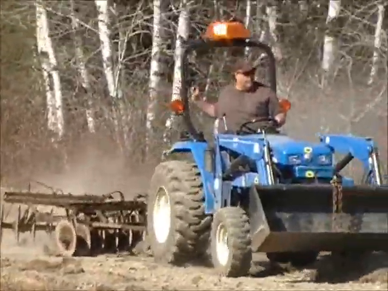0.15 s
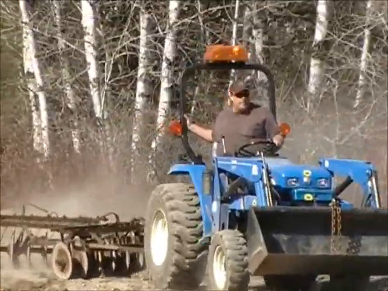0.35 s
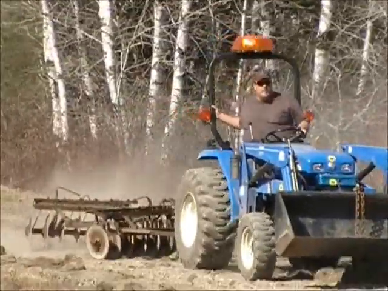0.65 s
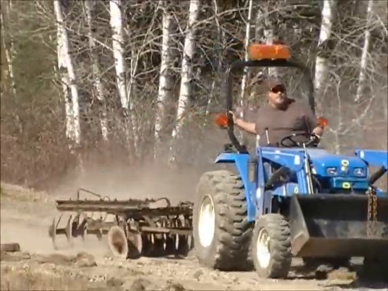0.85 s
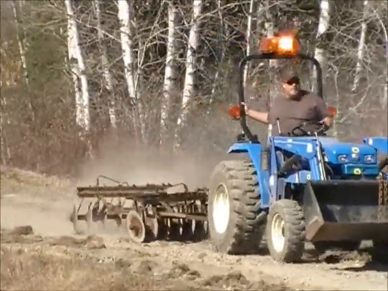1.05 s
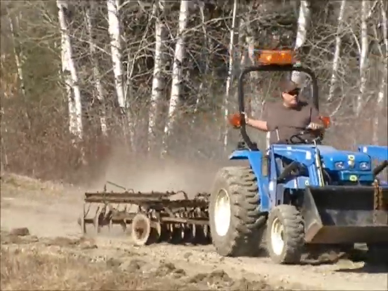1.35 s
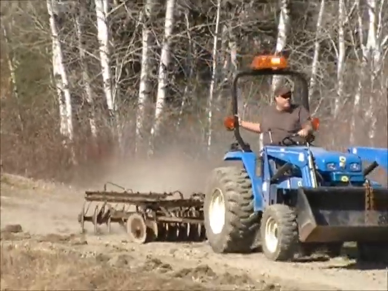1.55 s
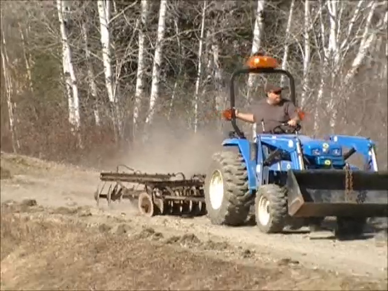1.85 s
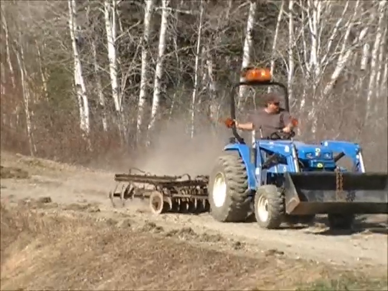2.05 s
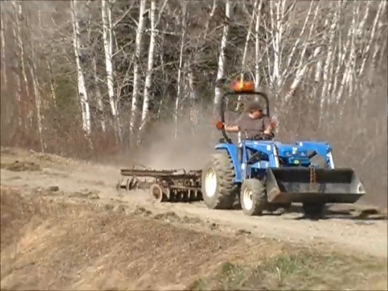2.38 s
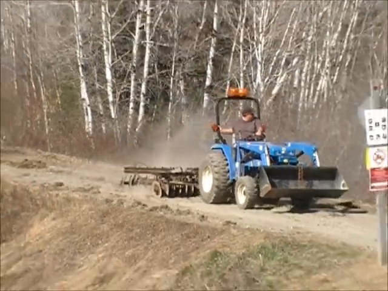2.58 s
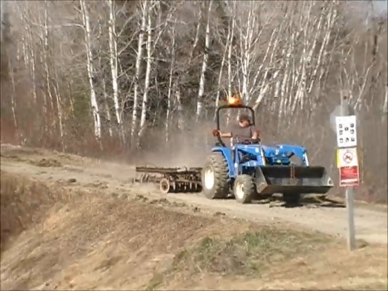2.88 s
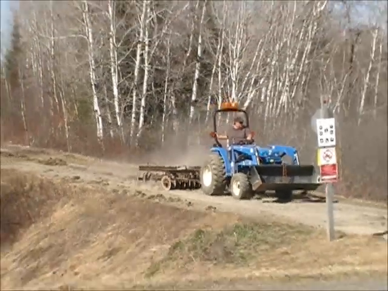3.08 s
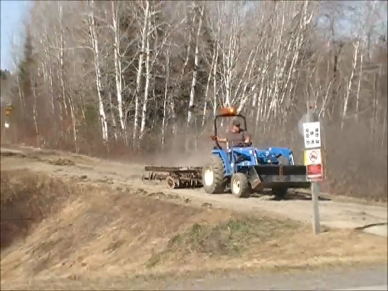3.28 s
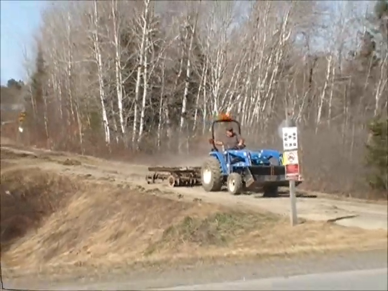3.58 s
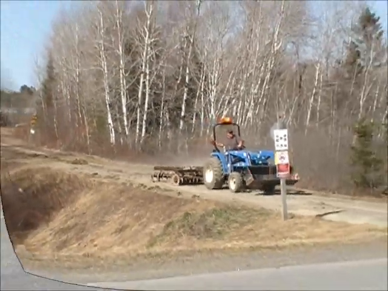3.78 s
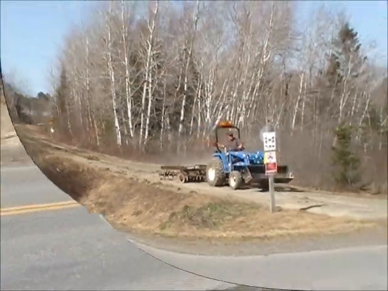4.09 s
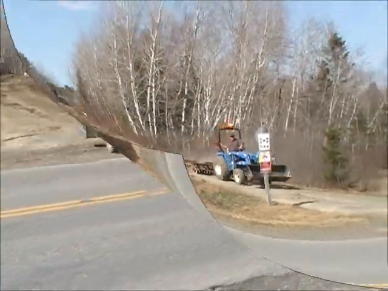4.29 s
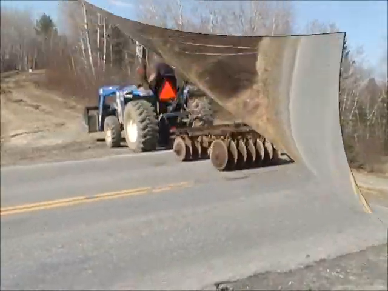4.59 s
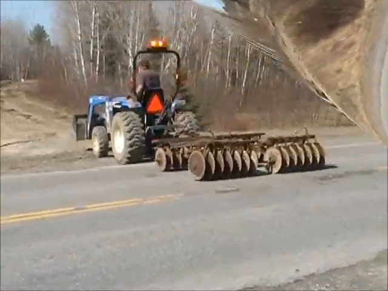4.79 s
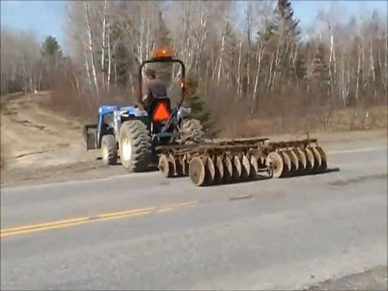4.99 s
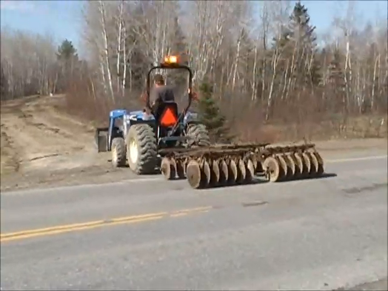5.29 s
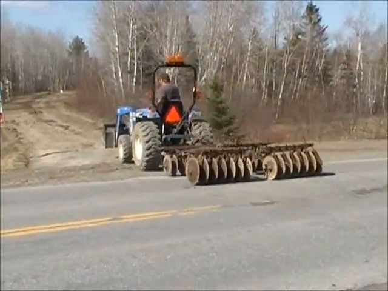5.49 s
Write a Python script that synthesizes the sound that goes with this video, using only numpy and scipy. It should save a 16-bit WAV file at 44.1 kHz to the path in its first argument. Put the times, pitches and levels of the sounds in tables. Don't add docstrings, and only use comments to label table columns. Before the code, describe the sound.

Outdoors on an exposed microphone, a strong gust booms and crackles for about a second. As it eases, a far small diesel tractor emerges with gritty rattling and clanking from its towed disc harrow. At about three and a half seconds the sound cuts to the machine close by on asphalt, with a higher engine hum, hard metallic knocks, ringing discs and more low wind puffs.

```python
import sys
import numpy as np
from scipy import signal
from scipy.fft import rfft, irfft
from scipy.io import wavfile
from scipy.ndimage import uniform_filter1d

SR = 44100
rng = np.random.default_rng(int(sys.argv[2]) if len(sys.argv) > 2 else 0)


def invert_db(level):
    return 10 ** (np.asarray(level, dtype=float) / 20)


def store_wav(level_fs):
    pcm = np.round(np.clip(np.atleast_2d(level_fs), -1, 1) * 32767)
    wavfile.write(sys.argv[1], SR, pcm.T.astype(np.int16))


N = 248724

CUT_S = 3.529
T = np.arange(N) / SR
NEAR = T >= CUT_S

# time in seconds, buffeting in dB, brightness in dB.
BREEZE = [(0.0, -9, -7), (0.42, -17, -11), (0.53, -15.5, -11.5), (0.78, -16, -13), (0.88, -25, -13.5),
          (1.17, -38.5, -29), (1.5, -21.5, -20.5), (1.9, -18.5, -16), (2.3, -23, -22.5), (2.6, -28, -26),
          (2.85, -33, -17.5), (3.1, -46, -26), (3.5, -15, -17), (3.9, -32, -21.5), (4.3, -13, -9),
          (4.7, -31, -21.5), (5.1, -18.5, -15.5), (5.64, -12, -21.5)]
# start in seconds, peak in dB, hold in seconds.
PUFFS = [(0.029, -8.5, 0.016), (0.095, -16, 0.014), (0.136, -10, 0.0098), (0.148, -8.5, 0.0095),
         (0.186, -7.5, .005), (0.2, -12.5, 0.011), (0.253, -9.5, 0.019), (0.351, -11.5, 0.017),
         (0.399, -10, 0.024), (0.466, -9, 0.029), (0.576, -10.5, 0.022), (0.655, -10, 0.031),
         (0.7, -8, 0.009), (0.736, -10.5, 0.0042), (0.771, -10, .014), (0.8, -9.5, .005), (0.83, -15, .005),
         (0.92, -21, .01), (0.974, -19, .01), (1.028, -25.5, .01), (1.253, -24.5, .01), (1.405, -13, 0.021),
         (1.654, -8.5, 0.0081), (1.83, -11.5, 0.018), (1.987, -12.5, 0.056), (2.143, -9.5, 0.0091),
         (2.238, -14, 0.0098), (2.326, -14, 0.024), (2.624, -19.5, 0.011), (2.773, -16.5, 0.035),
         (2.882, -19.5, 0.04), (3.032, -19, 0.0091), (3.137, -14.5, 0.023), (3.281, -9, 0.021),
         (3.481, -11, 0.033), (3.615, -12, .03), (3.762, -7.5, 0.013), (3.961, -7, 0.034),
         (4.058, -16, 0.078), (4.297, -9.5, 0.13), (4.458, -11.5, 0.11), (4.692, -16, 0.0082),
         (4.817, -21, .01), (4.914, -10.5, 0.078), (5.017, -8, 0.098), (5.3, -11.5, 0.15),
         (5.54, -14.5, 0.027)]
SWELL_DB_PER_S, SLACK_DB_PER_S = 263, 227
# frequency in Hz, density in dB per Hz.
BUFFET_COLOUR = [(12, -66), (30, -10), (60, -3.5), (113, 1.5), (203, -2.5), (243, -6), (305, -8),
                 (347, -13), (420, -17), (550, -38), (920, -120)]
# frequency in Hz, density in dB per Hz.
FAST_BUFFET_COLOUR = [(30, -36), (60, -9.5), (120, 1), (170, -1.5), (240, -3), (330, -5), (465, -15.5),
                      (700, -38)]
FAST_ENDS_S = 0.93
# frequency in Hz, density in dB per Hz.
CRACKLE_COLOUR = [(200, -10), (330, -0.5), (600, -5.5), (1200, -19.5), (2500, -35.5), (5000, -56.5),
                  (12000, -72)]
# start in seconds, peak in dB, ring in Hz, t60 in seconds.
THUMPS = [(0.246, -25, 95, 0.097), (0.564, -20, 249, 0.083), (0.645, -20, 143, 0.064),
          (0.909, -14.5, 135, 0.025), (1.386, -22, 170, 0.059), (1.535, -23, 120.5, 0.085),
          (1.646, -37, 153, 0.061), (1.815, -22, 195, 0.089), (1.966, -18, 83.4, 0.059),
          (2.023, -15, 101, 0.071), (2.045, -17.5, 330, 0.048), (2.33, -19.5, 310, 0.053),
          (3.29, -18, 300, 0.034), (2.135, -19, 143, 0.07), (2.238, -14.5, 78.1, 0.063),
          (2.313, -18, 128, 0.095), (2.409, -22, 88.8, 0.078), (2.601, -18, 225, 0.06),
          (2.872, -23, 153, 0.059), (3.138, -11, 268, 0.065), (3.158, -20.5, 180, 0.06),
          (3.255, -19, 130, 0.08)]
# start in seconds, peak in dB.
SLAPS = [(0.026, -29), (0.098, -24), (0.134, -26), (0.151, -23), (0.188, -18), (0.249, -25), (0.302, -25),
         (0.334, -26), (0.354, -29), (0.401, -21), (0.429, -25), (0.468, -25), (0.505, -23), (0.545, -30),
         (0.583, -31), (0.598, -26), (0.618, -29), (0.642, -27), (0.708, -25), (0.748, -22), (0.783, -25),
         (0.837, -34), (0.882, -39), (0.921, -32)]
# start in seconds, peak in dB.
TICKS = [(0.023, -37), (0.1251, -45), (0.1466, -50), (0.1994, -47), (0.2583, -45), (0.397, -54),
         (0.7228, -55), (0.7437, -53), (0.7701, -52), (0.7824, -57)]

# time in seconds, level in dB.
HEARD_FAR_NEAR = [
    [(0.6, -68), (0.88, -54.5), (1.22, -43.5), (1.36, -35.5), (1.7, -35.5), (2.05, -37), (2.3, -33),
     (2.8, -33), (3.0, -32.5), (3.3, -35), (3.44, -33.5), (3.52, -42.5)],
    [(3.53, -18), (4.1, -18), (4.85, -17.5), (5.17, -23.5), (5.3, -21.5), (5.64, -21.5)],
]
# frame, grit and housing, each in dB.
FAINT_DB = [-51.5, -64, -72]
GRIT_FAR_DB, GRIT_GAIN_DB_PER_S, GRIT_NEAR_DB = -9.5, 3, -7
HOUSING_FAR_DB, HOUSING_NEAR_DB = -39.5, -6.5
# start in seconds, rise in dB, hold in seconds.
RUTS = [(0.665, 15.5, 0.038), (1.231, 8.5, 0.02), (1.556, 5, 0.036), (1.763, -0.5, 0.037),
        (2.097, 6.5, 0.05), (2.215, -2, 0.015), (2.672, 4.5, 0.069), (2.82, 5.5, 0.14), (3.02, 2, 0.022),
        (3.145, 7, 0.048), (3.234, 5.5, 0.039), (3.38, 3, 0.099), (3.525, 8, 0.023), (3.745, 2.5, 0.09),
        (3.916, 1, 0.066), (4.008, 3, 0.036), (4.165, 5.5, 0.033), (4.365, 2.5, 0.0097), (4.522, 1, 0.049),
        (4.605, 4.5, 0.031), (4.711, 4, 0.0085), (4.823, 4, 0.06), (4.91, 4.5, 0.037), (4.974, 1.5, 0.025),
        (5.04, 4.5, 0.037), (5.109, 3.5, 0.022), (5.19, 5.5, 0.027), (5.238, 3.5, 0.051), (5.292, 2, 0.044),
        (5.375, 2, 0.021), (5.52, 1.5, 0.15)]
BITE_S, EASE_S = 0.0082, 0.04
FRAME_BITE, HOUSING_BITE = 0.57, 0.79

# time in seconds, firing rate in Hz, exhaust level in dB.
EXHAUST = [(0, 56.44, -42), (1.0, 55.8, -57), (1.5, 56.28, -42), (2.2, 56.17, -45.5), (2.6, 56.16, -43),
           (3.0, 56.22, -45), (3.52, 56.26, -45.5), (3.53, 62.73, -36.5), (4.1, 62.7, -33),
           (4.5, 63.1, -37.5), (4.8, 63.07, -34), (5.1, 62.3, -42), (5.64, 62.1, -36)]
# multiple of the firing rate, far level in dB, near level in dB.
EXHAUST_ORDERS = [(1, 4.5, 1.5), (2, -2, -5), (3, 1, -0.5), (4, -6.5, 0.5), (5, -11, -1.5), (6, -4.5, -14)]
# frequency in Hz, density in dB per Hz.
HOUSING_COLOUR = [(47, -28), (80, -14.5), (188, -3.5), (221, -4), (245, -4), (399, -4.5), (642, -2),
                  (752, -7), (1000, -11), (1300, -32), (2200, -120)]

# start in seconds, peak in dB, ring in Hz.
CLANKS_FAR = [(1.1542, -32, 3300), (1.229, -32, 5940), (1.3528, -26, 3100), (1.3953, -21.5, 3220),
              (1.43, -20, 3130), (1.4894, -31, 3190), (1.5426, -25, 3100), (1.5754, -20, 3850),
              (1.62, -25, 7160), (1.642, -32.5, 8600), (1.738, -32, 9050), (1.78, -19, 3060),
              (1.8681, -21.5, 3950), (2.0368, -19.5, 3020), (2.0976, -25, 3130), (2.118, -16.5, 4140),
              (2.147, -21, 6440), (2.193, -19, 4070), (2.2512, -10.5, 3390), (2.3163, -30, 3154),
              (2.3744, -18, 3300), (2.4363, -23, 6360), (2.6563, -15, 4800), (2.697, -21, 4160),
              (2.8134, -17.5, 8000), (2.8523, -15, 7440), (2.941, -14, 3230), (3.0308, -13, 3860),
              (3.147, -36, 3760), (3.233, -6.5, 4920), (3.3025, -9, 3220), (3.3693, -14.5, 7640),
              (3.425, -18, 3980), (3.5039, -24.5, 4060)]
# start in seconds, peak in dB, ring in Hz.
CLANKS_NEAR = [(3.5374, -16, 4310), (3.5729, -11, 3640), (3.647, -5.5, 3666), (3.7628, -5, 3780),
               (3.7836, -6, 7300), (3.826, -2.5, 3460), (3.921, -3.5, 8060), (3.966, -12, 5970),
               (4.034, -16, 4060), (4.1046, -2.5, 8000), (4.1644, -19, 3670), (4.244, -10, 5100),
               (4.4033, -4, 3690), (4.4881, -11.5, 6760), (4.553, -15, 7600), (5.188, -13.5, 3820),
               (5.3562, -12, 3000), (5.403, -12, 8000), (5.4553, -26, 3100), (5.522, -10, 3980),
               (5.5782, -10.5, 7650)]
CLANK_T60_S, RING_FAR, RING_NEAR = 0.089, 0.4, 0.23
RATTLE_CYCLES = 1.47
# start in seconds, peak in dB, ring in Hz, t60 in seconds.
KNOCKS = [(2.2505, -10, 1160, 0.1), (2.66, -8, 1350, 0.08), (3.534, -9, 1220, 0.052),
          (3.6293, -0.5, 1198, 0.1), (3.734, -2, 1174, 0.12), (3.794, -15, 1150, 0.056),
          (3.8361, 2, 1090, 0.1), (3.888, -1, 1173, 0.1), (3.9601, -14, 1150, 0.055),
          (4.0221, 4.5, 1120, 0.072), (4.152, -1.5, 1100, 0.19), (4.172, 0.5, 1840, 0.12),
          (4.204, 4.5, 1197, 0.076), (4.402, 2.5, 1854, 0.11), (4.42, -2, 1730, 0.08),
          (4.246, -4, 1270, 0.059), (4.378, -6, 1170, 0.059), (4.471, -1, 1270, 0.048),
          (4.519, -5, 1124, 0.081), (4.558, -3.5, 1090, 0.082), (4.7106, -16, 1270, 0.057),
          (4.7534, 3, 1163, 0.19), (4.8158, 4, 1940, 0.066), (4.8685, 0, 1235, 0.078),
          (5.0713, -12, 1220, 0.07), (5.2299, -10, 1250, 0.061), (5.2965, 0.5, 1940, 0.21)]
# frequency in Hz, density in dB per Hz.
FRAME_FAR = [(530, -31), (900, -9), (1010, -9.5), (1170, -3.5), (1310, -1.5), (1390, -8), (1470, -14.5),
             (1580, -16.5), (1690, -14), (1870, -4.5), (2100, -4.5), (2430, -17), (2900, -12.5),
             (3770, -24), (6380, -120)]
# frequency in Hz, density in dB per Hz.
FRAME_NEAR = [(530, -28), (900, -13.5), (1020, -9), (1080, -7.5), (1170, 1.5), (1290, -2.5), (1430, -24.5),
              (1560, -10), (1880, -3.5), (2160, -11), (2410, -12.5), (2620, -13.5), (2900, -12.5),
              (3770, -27), (6380, -120)]
# frequency in Hz, density in dB per Hz.
GRIT_FAR = [(1590, -40), (2700, -5), (3080, 2), (3490, -3), (3930, -1), (4870, -6.5), (5430, -6),
            (7970, -6), (10000, -19.5), (11600, -28), (13500, -32.5), (15700, -34)]
# frequency in Hz, density in dB per Hz.
GRIT_NEAR = [(1590, -35), (2700, -5.5), (3390, -2), (4260, -2.5), (4650, -4), (6480, -5), (7510, -3),
             (8390, -6), (10500, -15), (13300, -28), (14800, -34), (15700, -42)]
# frequency in Hz, level in dB, t60 in seconds.
DISC_MODES = [(1100, 2.5, 0.21), (1144, 2.5, 0.32), (1171, 0, 0.13), (1198, 1, 0.29), (1250, -5, 0.071),
              (1293, -4, 0.11), (1620, -8, 0.078), (1780, -5, 0.39), (1880, -5, 0.047), (1940, -5, 0.056),
              (2230, -8, 0.067), (2587, -4, 0.035), (3640, -5, 0.053)]
# frequency in Hz, side minus mid in dB.
WIDTH = [(300, -19), (1300, -19), (2400, -12), (4400, -15), (6500, -19.5), (8500, -11), (15000, -7)]


def level(x, db):
    return x * invert_db(db) / np.sqrt(np.mean(x ** 2))


def curves(rows):
    s, *columns = np.transpose(rows)
    return [np.interp(T, s, column) for column in columns]


def colour(x, points):
    hz, db = np.transpose(points)
    size = 2 ** 13
    log_hz = np.log(np.arange(size // 2 + 1) * SR / size + 1)
    outside = np.maximum(np.log(hz[0]) - log_hz, 0) + np.maximum(log_hz - np.log(hz[-1]), 0)
    gain_db = np.maximum(np.interp(log_hz, np.log(hz), db) - 60 * outside, -90)
    cepstrum = irfft(gain_db * np.log(10) / 20)
    cepstrum[1:size // 2] *= 2
    cepstrum[size // 2 + 1:] = 0
    impulse = irfft(np.exp(rfft(cepstrum)))[:size // 2]
    return signal.fftconvolve(x, impulse)[:N]


def by_shot(x, far, near):
    far_sound, near_sound = colour(x, far), colour(x, near)
    return np.where(NEAR, level(near_sound, 0), level(far_sound, 0))


def ring(x, hz, t60):
    pole = np.exp(2j * np.pi * hz / SR - np.log(1000) / (t60 * SR))
    return signal.lfilter([1], [1, -pole], x).imag


def walk(rate):
    k = int(SR / rate)
    held = rng.standard_normal(N // 400)[np.arange(N) // k]
    slewed = uniform_filter1d(uniform_filter1d(held, k), k)
    return slewed / slewed.std()


def jolts(per_s, spread_db):
    hit = rng.random(N) < per_s / SR
    return hit * rng.standard_normal(N) * invert_db(spread_db * rng.exponential(size=N))


def strikes(rows, overtone_db, attack_s):
    out, hiss = np.zeros(N), rng.standard_normal(N)
    spreads = rng.uniform(-1, 1, size=(len(rows), 3, 1))
    for (s, db, hz, t60, share), spread in zip(rows, spreads):
        i, share, t60 = int(s * SR), np.clip(share, 0, 1), max(t60, .01)
        t = np.arange(min(int(t60 * SR / 2 + SR / 100), N - i)) / SR
        fade = np.exp(-np.log(1000) * t / t60) * np.minimum(t / attack_s, 1)
        neighbour_hz = np.minimum(hz * 2 ** (0.61 * spread), SR / 3)
        neighbours = np.sin(2 * np.pi * neighbour_hz * t).sum(axis=0)
        tone = np.sin(2 * np.pi * hz * t) + invert_db(overtone_db) * neighbours
        rattle = level(ring(hiss[i:i + len(t)], hz, RATTLE_CYCLES / hz), -4.5)
        out[i:i + len(t)] += invert_db(db) * fade * (share * tone + (1 - share) * rattle)
    return out


def gusts():
    gust_db, bright_db = curves(BREEZE)
    for s, db, hold in PUFFS:
        before, after = np.maximum(s - T, 0), np.maximum(T - s - hold, 0)
        gust_db = np.maximum(gust_db, db - SWELL_DB_PER_S * before - SLACK_DB_PER_S * after)
    return gust_db, bright_db


def hits_and_ticks():
    thumps = strikes([(*row, .75) for row in THUMPS], -5, 0.0045)
    slaps = strikes([(*row, 800, .022, .15) for row in SLAPS], -6, .0008)
    ticks = strikes([(*row, 13000, .01, 0) for row in TICKS], -6, .0004)
    thumps = invert_db(-2.5) * colour(thumps, [(30, 0.5), (500, 4.0), (1500, -9)])
    slaps = invert_db(1.5) * colour(slaps, [(250, 1.0), (1500, 1.5), (4000, -10), (9000, -24)])
    return thumps + slaps + invert_db(5.0) * ticks


def wind():
    gust_db, bright_db = gusts()
    tumble = invert_db(0.98 * walk(40))
    fast = np.clip((FAST_ENDS_S - T) * 20, 0, 1)

    def eddies(sharp_db):
        slaps = 0.95 * rng.standard_normal(N) + level(jolts(400, 1.1), -0.79)
        fast_boom = level(colour(slaps, FAST_BUFFET_COLOUR), 0)
        boom = level(colour(slaps, BUFFET_COLOUR), 0)
        crackle = level(tumble * colour(slaps, CRACKLE_COLOUR), 0)
        return tumble * (fast * fast_boom + (1 - fast) * boom) + invert_db(bright_db + sharp_db) * crackle

    side = invert_db(gust_db - 0.5) * eddies(0.68)
    mid = invert_db(gust_db - 18) * eddies(1.0)
    mid = colour(mid, [(20, 8.6), (70, 2.76), (300, 0.92), (1500, 7.7), (5000, 8), (15000, 3)])
    mid = mid + hits_and_ticks()
    return np.array([mid + 1.123 * side, mid - 0.99 * side])


def scattered(mid):
    echo = rng.standard_normal(2000) * np.exp(-np.arange(2000) / (0.022 * SR))
    echo = echo / np.sqrt(np.sum(echo ** 2))
    side = colour(signal.fftconvolve(mid, echo)[:N], WIDTH)
    return np.array([side, -side])


def ruts():
    return sum(db * np.interp(T - s, [-BITE_S, 0, hold, hold + EASE_S], [0, 1, 1, 0])
               for s, db, hold in RUTS)


def layers():
    bite = ruts()
    far, near = [curves(rows)[0] for rows in HEARD_FAR_NEAR]
    heard = np.where(NEAR, near, far)
    frame = heard + FRAME_BITE * bite
    grit = heard + bite + np.where(NEAR, GRIT_NEAR_DB, GRIT_FAR_DB + GRIT_GAIN_DB_PER_S * T)
    housing_near = heard + HOUSING_NEAR_DB + HOUSING_BITE * bite
    housing = np.where(NEAR, housing_near, np.minimum(heard, HOUSING_FAR_DB))
    return [20 * np.log10(np.hypot(invert_db(db), invert_db(floor)))
            for db, floor in zip((frame, grit, housing), FAINT_DB)]


def engine(housing_db):
    hz, exhaust_db = curves(EXHAUST)
    phase = np.cumsum(hz * (1 + .012 * walk(9))) / SR
    tones = 0
    for k, far_db, near_db in EXHAUST_ORDERS:
        tone_db = np.where(NEAR, near_db, far_db) + 2.97 * walk(16)
        tones = tones + invert_db(tone_db) * np.sin(2 * np.pi * k * phase + k * k)
    firing_db = 4.8 * rng.standard_normal(N // 100)[phase.astype(int)]
    puff = np.exp(-(phase % 1) / 0.53) * invert_db(firing_db)
    rumble = rng.standard_normal(N) * (1.0 + puff) * invert_db(1.11 * walk(12))
    rumble = level(colour(rumble, HOUSING_COLOUR), 0.82)
    return np.sqrt(2) * invert_db(exhaust_db) * tones + invert_db(housing_db) * rumble, puff


def clanks():
    rows = [(*row, CLANK_T60_S, RING_FAR if row[0] < CUT_S else RING_NEAR)
            for row in CLANKS_FAR + CLANKS_NEAR]
    path = [(2000, -10), (4000, -1.5), (8500, 4.0), (12000, -11), (15500, -38)]
    return invert_db(-1.5) * colour(strikes(rows, -12.0, 0.0027), path)


def knocks():
    blows = strikes([(*row, .8) for row in KNOCKS], -10.5, 0.00097)
    return invert_db(-9.5) * colour(blows, [(800, 2.0), (3000, -5.5), (8000, -2)])


def jingle(count):
    chance = rng.random((count, 3))
    rows = [(s * N / SR, -2.2 * np.log(size + 0.01), 4000 * 2.5 ** pitch, .045, .8)
            for s, size, pitch in chance]
    return strikes(rows, -9.5, 0.0046)


def harrow(puff, frame_db, grit_db):
    shake = invert_db(1.62 * walk(16))
    drive = level(rng.standard_normal(N) * (3.0 + puff), 0) + level(jolts(540, 1.7), -8.5)
    frame = by_shot(drive * shake, FRAME_FAR, FRAME_NEAR)
    discs = 0
    for hz, db, t60 in DISC_MODES:
        sway = invert_db(db + 0.43 * walk(6.8))
        discs = discs + sway * ring(jolts(700, 2.2), hz, t60) / np.sqrt(t60)
    discs = level(discs, 0) * invert_db(np.where(NEAR, -2.5, -12))
    grind = rng.standard_normal(N) + level(jolts(1500, 1.3), -7.5)
    grind = grind * shake * invert_db(2.8 * walk(27.8)) + level(jingle(count=1000), -8.0)
    grit = by_shot(grind, GRIT_FAR, GRIT_NEAR)
    return invert_db(frame_db - 1.5) * (frame + discs) + invert_db(grit_db + 0.7) * grit


def scene():
    frame_db, grit_db, housing_db = layers()
    motor, puff = engine(housing_db)
    mid = motor + clanks() + knocks() + harrow(puff, frame_db, grit_db)
    pan = invert_db(np.array([[.55], [-.55]]))
    return pan * mid + scattered(mid) + wind()


def roll_off(x):
    return signal.sosfilt(signal.butter(12, 15830, fs=SR, output="sos"), x)


def record(dry):
    ceiling, knee = np.where(NEAR, 1.0, 0.6), 44.0
    x = dry / (1 + np.abs(dry / ceiling) ** knee) ** (1 / knee)
    x = signal.sosfilt(signal.butter(6, 15000, fs=SR, output="sos"), x)
    mix = np.clip(0.95 * x, -1, 1)
    return roll_off(mix)


dry = scene()
out = record(dry)
store_wav(out)
```